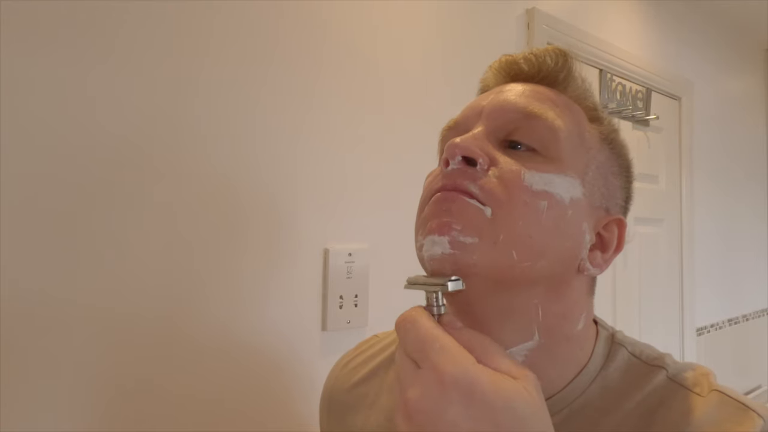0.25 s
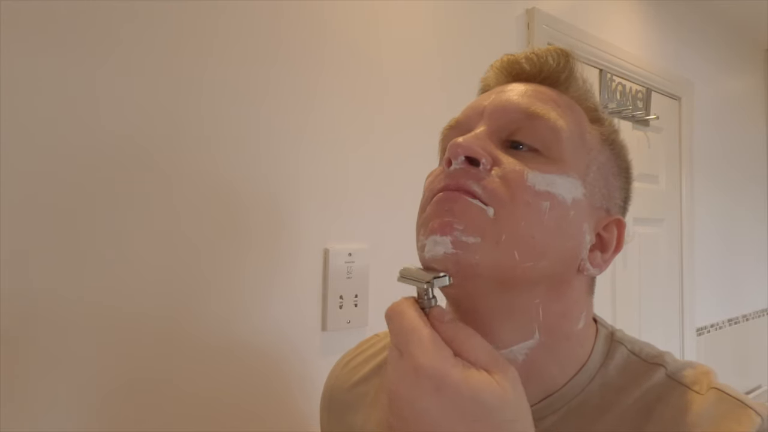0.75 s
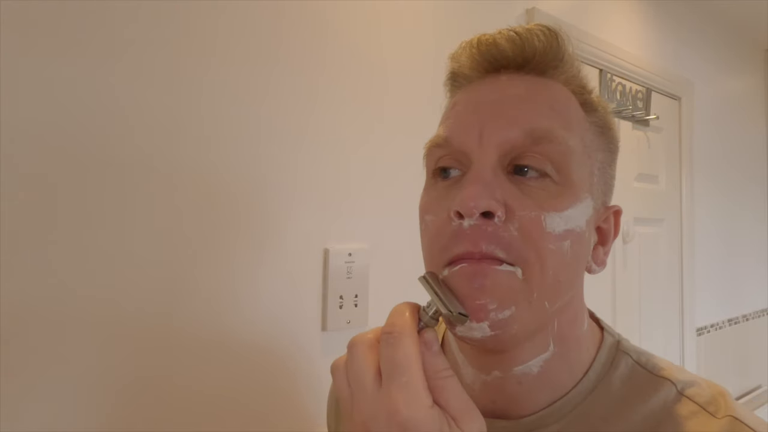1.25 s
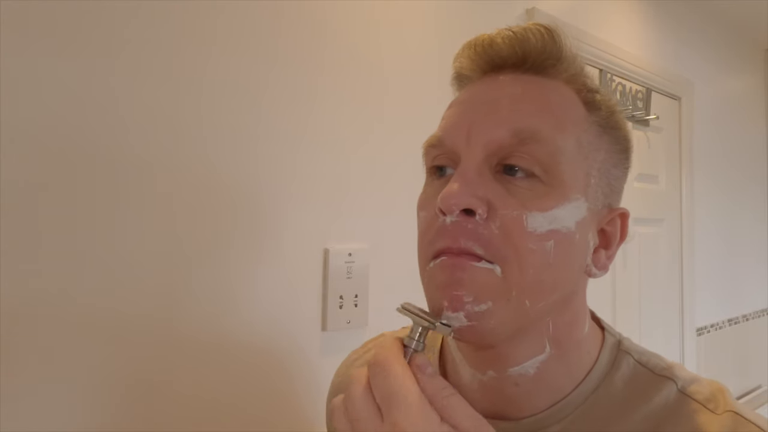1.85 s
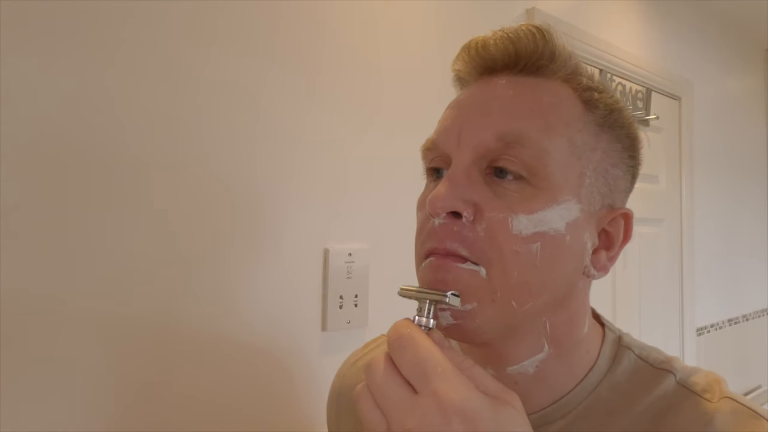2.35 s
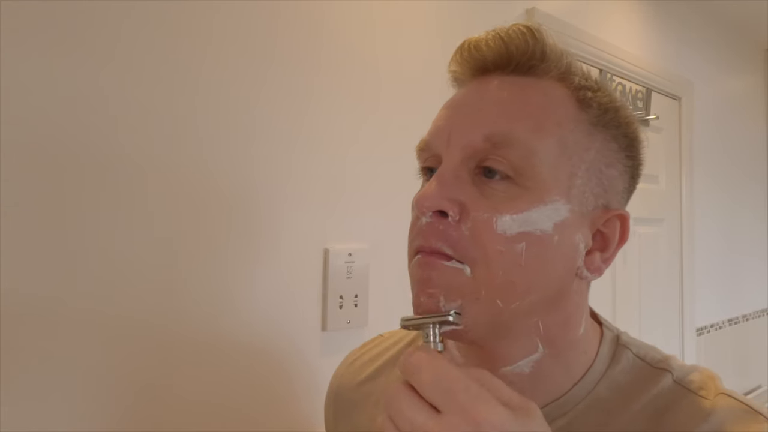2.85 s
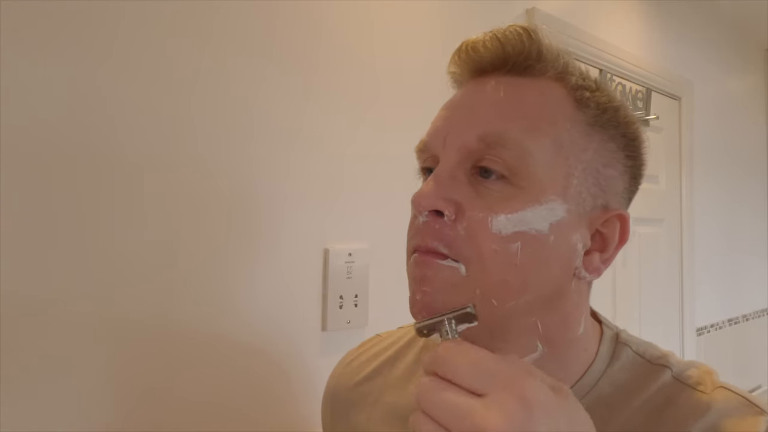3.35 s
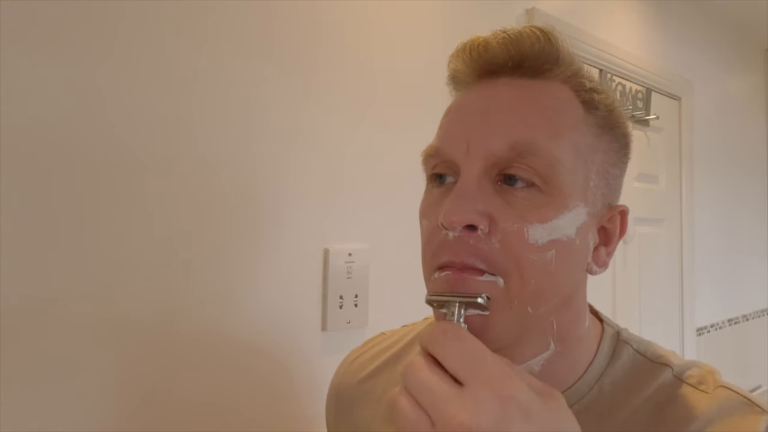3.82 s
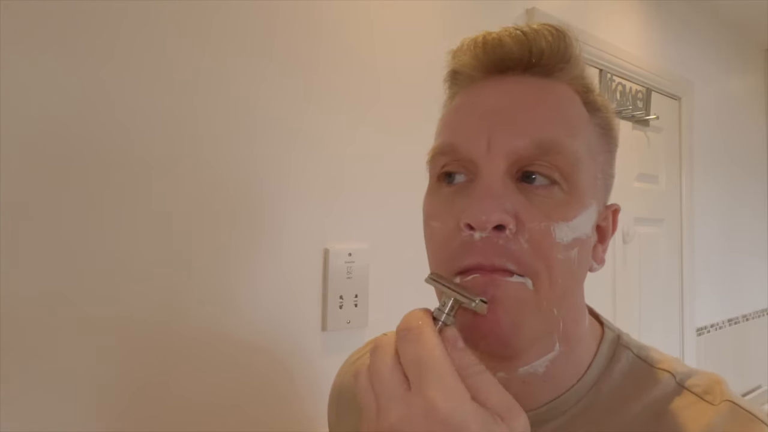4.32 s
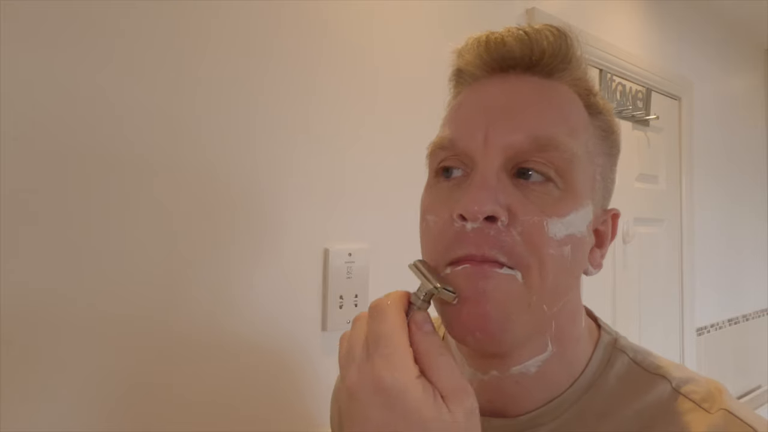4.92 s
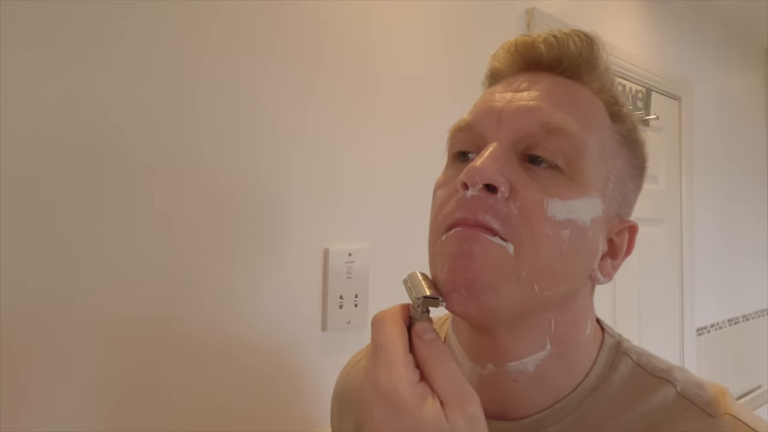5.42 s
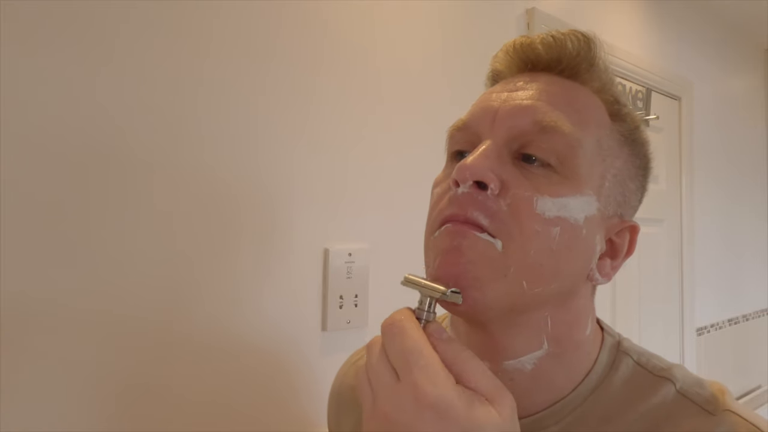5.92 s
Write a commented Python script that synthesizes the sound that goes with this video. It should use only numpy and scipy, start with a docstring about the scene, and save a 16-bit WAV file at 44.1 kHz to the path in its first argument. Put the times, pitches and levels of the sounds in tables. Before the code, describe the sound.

Short, raspy razor strokes on stubble, with a sink drain gulping and bubbling through the first half, in a small echoing bathroom.

```python
"""A drain glugs, ever more slowly, for the first few seconds in a small bathroom with a faint hum.
Each gulp of air thumps the waste pipe, and small bubbles fizz, gurgle and pop in between.
Almost at once a safety razor joins in, scraping lathered stubble in short strokes: every cut hair
is a tiny click, and thousands of them blur into a rasp. The shaving goes on after the drain stops.
The walls echo both the drain and the razor."""
import sys
import numpy as np
from scipy import signal
from scipy.fft import rfft, irfft, next_fast_len
from scipy.io import wavfile
from scipy.ndimage import uniform_filter1d

SR = 44100
rng = np.random.default_rng(int(sys.argv[2]) if len(sys.argv) > 2 else 0)


def put_to_file(sound):
    """Save the sound as 16-bit audio at rate SR, in the file named by the first command-line argument."""
    columns = np.atleast_2d(sound).T  # one column per channel
    safe = np.clip(columns, -1, 1)
    whole_steps = np.round(safe * 32767)
    wavfile.write(sys.argv[1], SR, whole_steps.astype(np.int16))


N = 272097
T = np.arange(N) / SR

# Levels are relative. A fade_s or t60 is the time a sound takes to die away by 60 dB.
# tone colour of the room's soft noise: pitch_hz, level_db
AIR_COLOUR = [(29, -35), (50, -12), (104, -10), (170, -5), (260, -2), (350, -0.5), (460, -11), (803, -10),
              (925, -16.5), (1290, -17.5), (1790, -22), (2730, -25), (7000, -40.5), (9070, -57.5),
              (11700, -47), (13800, -59.5)]
# how loud that noise is over time: time_s, level_db
AIR_LEVEL = [(0, -29), (1.5, -35), (3.0, -32.5), (3.75, -36.5), (4.2, -32.5), (5.0, -32.5), (5.6, -32),
             (6.17, -32.5)]
# tones of the low hum: pitch_hz, level_db
HUM_TONES = [(69, -45), (158, -43.5), (247.6, -40)]
# how loud the tiny bubbles fizz over time: time_s, level_db
FIZZ_LEVEL = [(0, -35), (.3, -48), (.6, -52.5), (.95, -49), (1.2, -50.5), (1.55, -61.5), (1.95, -45),
              (2.3, -63)]
# flurries of larger bubbles in the pipe: start_s, length_s, pitch_hz, level_db
GURGLES = [(0.006, .016, 925, -15.5), (0.456, 0.005, 1075, -29), (0.943, 0.0089, 684, -20.5),
           (1.115, .03, 792, -18), (1.282, .005, 890, -28.5)]
# gulps of air (snap and splash are added to the level): start_s, level_db, snap_db, splash_db
GULPS = [(0.042, 1.5, -27.5, -24.5), (0.2, 2.5, -25, -32), (0.375, 0.5, -37, -36), (0.529, 2, -27, -26),
         (0.704, 1.5, -34.5, -23), (0.838, 3.5, -21.5, -26.5), (1.03, -1, -23, -34), (1.179, 0.5, -37, -45),
         (1.382, 2, -27.5, -28), (1.507, 3.5, -29.5, -22.5), (1.669, -1, -30, -29), (1.83, 0, -27.5, -38),
         (2.042, 1.5, -27.5, -36), (2.251, 0, -26.5, -26), (2.475, 0, -28, -29), (2.688, 0, -26.5, -40),
         (2.921, -1.5, -27.5, -30), (3.158, -2, -29.5, -40), (3.428, -3.5, -34.5, -36)]
# ringing tones of the trap (the bend under the basin), pipe and plughole: pitch_hz, level_db, fade_s
TRAP_TONES = [(376.1, 2.5, 0.046), (556.4, 13, 0.035)]
PIPE_TONES = [(743.8, -6.5, 0.22), (858.8, -1, 0.16), (918, -4.5, 0.059), (1072.3, -6.5, 0.14),
              (1132.5, 1, 0.066)]
PLUGHOLE_TONES = [(2012, 5.5, 0.042), (2192, -1, 0.021), (2380, -5.5, 0.035), (2826, -1.5, 0.04)]
# tone colour of a bursting bubble's spray: pitch_hz, level_db
SPRAY_COLOUR = [(600, 13), (1500, -2), (2900, 5), (3500, -2), (4000, -3.5), (4550, 0), (5200, -4.5),
                (6100, 0.5), (7500, -44), (13000, -31.5)]
# first echoes off basin, mirror and walls: delay_ms, gain
ECHOES = [(6.56, .33), (9.24, .5), (11.66, .56), (14.3, .56), (17.18, .32), (19.57, .36), (25.83, .24),
          (28.32, .19), (49.12, .16), (52.3, .2), (55.08, .31), (57.86, .14), (80.62, .16), (86.99, .12)]
# how long the room's echo lingers: pitch_hz, fade_s
ROOM_FADE = [(150, 0.95), (400, 0.98), (1000, 0.71), (3000, 0.53), (7000, 0.29), (12000, 0.23)]
# the room's own tones, set ringing by each thump: pitch_hz, level_db, fade_s
ROOM_TONES = [(250, -16, 0.19), (281.5, 18, 0.64), (462, -8, 0.51)]
# small bubbles bursting (splash is added to the level): start_s, level_db, pitch_hz, splash_db
POPS = [(0.109, -25, 1980, -15), (0.2386, -23, 2880, -8), (0.2768, -24, 2010, -19), (.3058, -28, 2180, -13),
        (.4138, -28, 2000, -19), (0.472, -31, 2600, -9), (0.7648, -20, 2100, 3), (0.774, -25.5, 3500, -1),
        (0.9236, -22.5, 2010, -11), (0.9442, -15, 1970, -14), (1.282, -21.5, 1990, -14),
        (1.489, -17.5, 2110, -11), (1.6048, -22.5, 2020, -13), (1.8974, -29, 5800, -30),
        (1.933, -27, 3580, 14)]
# razor strokes (rasp comes from the blade's angle): start_s, swell_s, pull_s, level_db, rasp_db
STROKES = [(0.125, 0.019, 0.04, -40.5, -10), (0.458, 0.0095, 0.057, -42.5, -10),
           (0.735, .012, .115, -46.5, -3.5), (1.29, 0.058, 0.059, -39.5, -2.5),
           (1.671, 0.023, .112, -42.5, -4.5), (2.039, 0.029, 0.086, -41.5, -3),
           (2.422, 0.017, 0.049, -36, -10), (2.785, 0.057, 0.087, -41, 0.5), (3.22, 0.051, 0.038, -39, -3),
           (3.548, 0.028, 0.022, -39.5, -9), (3.845, 0.032, .035, -50.5, 8), (4.1, 0.037, 0.017, -47, 10),
           (4.425, 0.086, 0.026, -39, -3), (4.75, 0.054, 0.033, -45.5, 5), (4.995, 0.046, 0.036, -44.5, 1),
           (5.33, 0.037, .12, -57, 7), (5.487, 0.011, 0.017, -36.5, -6), (5.57, .02, .045, -51.5, 2.5),
           (5.915, 0.056, 0.049, -35, -4.5)]
# tone colour of a cut hair, heard through the razor's blade and head: pitch_hz, level_db
BLADE_COLOUR = [(700, -7), (1500, -1), (2600, 4), (4500, 0.5), (6500, 0.5), (7800, -5), (8800, -12.5),
                (9100, -13.5), (9600, -9), (10500, -2.5), (11400, 4), (12500, -3), (13300, -16.5),
                (14200, -37)]
# the blade catching on tough hairs: start_s, level_db
SNAGS = [(0.4673, -39), (0.7452, -44), (1.3495, -39.5), (2.075, -45), (2.438, -37), (2.8046, -40),
         (3.5707, -44), (5.0769, -38.5), (5.5024, -47), (5.927, -34.5), (5.9694, -37)]

FIZZ_END_S, EMPTY_S = 2.5, 3.46  # the fizz stops, then the basin runs dry
# how the gulps change as the basin empties: value when full, value when empty, curve (higher is later)
UPPER_TONE_SHIFT_DB = (-8.5, -18, 3)
PIPE_RING_DB = (-16.5, -24.5, 3.5)
POCKET_DB = (-19.5, -43.5, 2.5)
TRAP_FADE_STRETCH = (1.01, 1.54, 9.7)


def undb(db):
    """Turn decibels into a number to multiply a sound by."""
    return 10 ** (np.asarray(db) / 20)


def unit(x):
    """Scale a sound so its average strength (rms) is 1."""
    return x / np.sqrt(np.mean(x ** 2))


def add(track, start_s, sound):
    """Mix a sound into a track at the given time."""
    i = max(int(start_s * SR), 0)
    track[i:i + len(sound)] += sound[:N - i]


def at_pitch(points, hz):
    """Read between the rows of a (pitch_hz, value) table, giving each octave equal room."""
    pitches, values = np.transpose(points)
    return np.interp(np.log(hz + 1), np.log(pitches), values)


def colour(x, points):
    """Make each pitch louder or softer, following a (pitch_hz, level_db) table."""
    n = next_fast_len(x.shape[-1] + 1024)
    gain = undb(at_pitch(points, np.fft.rfftfreq(n, 1 / SR)))
    return irfft(rfft(x, n) * gain, n)[..., :x.shape[-1]]


def band(x, low_hz, high_hz):
    """Keep mainly the pitches between two limits."""
    return signal.sosfilt(signal.butter(2, [low_hz, high_hz], "band", fs=SR, output="sos"), x)


def fade(t60):
    """A level that dies away, a third of a second long."""
    return np.exp(-np.log(1000) * T[:SR // 3] / t60)


def wander(per_s):
    """A random curve that drifts up and down by about 1."""
    step = int(SR / per_s)
    stairs = np.repeat(rng.standard_normal(N)[:N // step + 1], step)
    return unit(uniform_filter1d(stairs, step)[:N])


def clicks(per_s, spread_db):
    """Random clicks of very uneven size."""
    spikes = (rng.random(N) < per_s / SR) * rng.choice([-1, 1], N)
    return unit(spikes * undb(spread_db * np.minimum(rng.exponential(size=N), 4)))


def ring(tones, scatter, contact_s, stretch=1):
    """A knocked object rings with its own tones, a little out of tune at each knock."""
    t = T[:SR // 3]
    detune = 1 + scatter * rng.standard_normal(len(tones))
    y = sum((-1) ** k * undb(db) * fade(t60 * stretch) * np.sin(2 * np.pi * hz * detune[k] * t)
            for k, (hz, db, t60) in enumerate(tones))
    y *= 1 - np.exp(-(t / contact_s) ** 2)  # a longer push gives a softer start
    return y / np.abs(y).max()


def room_tone():
    """Soft air noise and a low hum that wavers."""
    air = unit(colour(rng.standard_normal(N), AIR_COLOUR))
    air *= undb(np.interp(T, *np.transpose(AIR_LEVEL)) + 0.55 * wander(7.4))
    hum = np.zeros(N)
    for hz, db in HUM_TONES:
        phase = 2 * np.pi * hz * T
        tone = (0.62 + 0.78 * wander(12)) * np.sin(phase) + 0.76 * wander(12) * np.cos(phase)
        hum += undb(db - 2) * tone
    return air + hum


def fizz():
    """Tiny bubbles keep bursting in the plughole until the water runs low."""
    tick = undb(-12) * ring(PLUGHOLE_TONES, scatter=0.01, contact_s=0.00023) + spray(t60=0.019)
    crackle = unit(signal.fftconvolve(clicks(per_s=130, spread_db=9), tick)[:N])
    level = undb(np.interp(T, *np.transpose(FIZZ_LEVEL)))
    return crackle * level * np.clip((FIZZ_END_S - T) / 0.2, 0, 1)


def spray(t60):
    """A bursting bubble throws droplets in a sudden, short hiss."""
    decay = fade(t60)
    swell = 1 - np.exp(-(T[:len(decay)] / 0.0004) ** 2)
    y = colour(rng.standard_normal(len(decay)), SPRAY_COLOUR) * swell * decay
    return y / np.abs(y).max()


def gurgles():
    """Larger bubbles ring in the pipe in quick flurries of seven."""
    track = np.zeros(N)
    for start, length, hz, db in GURGLES:
        for when in np.linspace(start, start + length, num=7):
            pitch_hz = hz * (1 + 0.18 * rng.uniform(-1, 1))
            add(track, when, undb(db - 1) * bubble(pitch_hz, t60=0.037, swell_s=0.00078, glide=0.13))
    return track


def bubble(hz, t60, swell_s, glide):
    """Trapped air swells into a tone whose pitch slides as it fades (upward if glide is positive)."""
    decay = fade(t60)
    swell = (1 - np.exp(-T[:len(decay)] / swell_s)) ** 2
    pitch_hz = hz * (1 + glide * (0.5 - decay))
    y = swell * decay * np.sin(2 * np.pi * np.cumsum(pitch_hz) / SR)
    return y / np.abs(y).max()


def splatter(per_s=28, end_s=1.1, low_hz=2400, high_hz=4800):
    """Droplets, flung up while the basin is still full, tick at random moments and pitches."""
    track = np.zeros(N)
    for when, height, softness in rng.random((int(per_s * end_s), 3)):
        hz = low_hz * (high_hz / low_hz) ** height
        add(track, when * end_s, undb(-29.5 - 10 * softness) * pop(hz, t60=0.032, width=0.11))
    return track


def pop(hz, t60, width):
    """The rough, short ring of a bursting bubble: fading noise around one pitch."""
    decay = fade(t60)
    y = band(rng.standard_normal(len(decay)) * decay, hz * (1 - width), hz * (1 + width))
    return y / np.abs(y).max()


def draining(change, time_s):
    """A setting's value on its way from a full basin to an empty one."""
    full, empty, curve = change
    return full + (empty - full) * (time_s / EMPTY_S) ** curve


def gulps():
    """Each gulp thumps the trap, rings the pipe and plughole, and leaves a pocket of air."""
    thump, pipe, plughole, pocket = np.zeros((4, N))
    low_tone, (upper_hz, upper_db, upper_t60) = TRAP_TONES
    for start, db, snap_db, splash_db in GULPS:
        trap = [low_tone, (upper_hz, upper_db + draining(UPPER_TONE_SHIFT_DB, start), upper_t60)]
        stretch = draining(TRAP_FADE_STRETCH, start)
        pipe_db = db + draining(PIPE_RING_DB, start)
        hit = start + 0.001  # the water closes just after the air has passed
        add(thump, hit, undb(db - 0.14) * ring(trap, scatter=0.004, contact_s=0.00086, stretch=stretch))
        add(pipe, hit, undb(pipe_db) * ring(PIPE_TONES, scatter=0.018, contact_s=0.0009))
        add(pipe, hit, undb(pipe_db - 3.5) * pop(787, t60=0.063, width=0.27))  # water slaps back
        snap = ring(PLUGHOLE_TONES, scatter=0.012, contact_s=0.0003)
        add(plughole, hit, undb(db + snap_db + 7) * snap)
        add(plughole, hit, undb(db + splash_db + 10.5) * spray(t60=0.043))
        pocket_hz = 171.4 * (1 + 0.067 * rng.standard_normal())
        pocket_tone = bubble(pocket_hz, t60=0.074, swell_s=0.025, glide=-0.11)
        add(pocket, start, undb(draining(POCKET_DB, start)) * pocket_tone)
    return thump, pipe, plughole, pocket


def echoes(x, share):
    """A sound followed by its first bounces off basin, mirror and walls."""
    y = x.copy()
    for delay_ms, gain in ECHOES:
        add(y, delay_ms / 1000, share * gain * x)
    return y


def reverb(x, build_s):
    """Countless later echoes blur into a tail whose high pitches die first."""
    hz, t, noise = signal.stft(rng.standard_normal(SR), SR, nperseg=256)
    decay = np.exp(-np.log(1000) * t / at_pitch(ROOM_FADE, hz)[:, None]) * (1 - np.exp(-t / build_s))
    decay /= np.sqrt(np.mean(decay ** 2, axis=1))[:, None]  # same energy at every pitch
    tail = signal.istft(noise * decay, SR)[1]
    return signal.fftconvolve(x, tail / np.linalg.norm(tail))[:N]


def bubble_pops():
    """Small bubbles burst in the plughole, each with a little spray."""
    track = np.zeros(N)
    for start, db, hz, splash_db in POPS:
        add(track, start, undb(db) * pop(hz, t60=0.029, width=0.051))
        add(track, start, undb(db + splash_db - 5.5) * spray(t60=0.063))
    return track


def drain():
    """All the water sounds, echoing around the bathroom."""
    thump, pipe, plughole, pocket = gulps()
    plughole += bubble_pops()
    pipe += gurgles()
    plughole += fizz() + splatter()
    low = echoes(thump, share=1)
    add(low, 0.024, undb(-7.5) * reverb(thump, build_s=0.0055))  # the tail follows the first echoes
    room_ring = ring(ROOM_TONES, scatter=0.0018, contact_s=0.0037)
    low += undb(-61) * signal.fftconvolve(thump, room_ring)[:N]
    middle = echoes(pipe, share=0.41) + undb(-1.5) * reverb(pipe, build_s=0.0017)
    high = echoes(plughole, share=0.15) + undb(-4.5) * reverb(plughole, build_s=0.0039)
    return low + middle + high + pocket + undb(-7.5) * reverb(pocket, build_s=0.022)


def stroke(start_s, swell_s, pull_s, swell_db=20, ease_db_per_s=31, lift_db_per_s=694.5):
    """Pressure of one stroke: the blade bites, eases along the pull and lifts off."""
    t = T - start_s
    bite = swell_db * np.clip(1 - t / swell_s, 0, 1)
    ease = ease_db_per_s * np.maximum(t - swell_s, 0)
    lift = lift_db_per_s * np.clip(t - swell_s - pull_s, 0, 1)
    return undb(-bite - ease - lift) * (t > 0)


def razor():
    """The blade cuts thousands of hairs a second, each a click, through hissing lather."""
    pressure, rasp = np.zeros(N), np.ones(N)
    for start, swell_s, pull_s, db, rasp_db in STROKES:
        pressure += undb(db) * stroke(start, swell_s, pull_s)
        rasp[int(start * SR):] = undb(rasp_db)
    pressure *= undb(2 * wander(130))  # dragging on skin makes the stroke judder
    for start, db in SNAGS:
        add(pressure, start, undb(db) * fade(t60=0.035))
    cuts = np.array([clicks(per_s=2800, spread_db=5) for _ in range(2)])
    lather = undb(-0.5) * rng.standard_normal((2, N))
    scrape = colour(cuts + lather, BLADE_COLOUR)
    scrape = pressure * scrape / np.std(band(scrape[0], 7500, 14000))
    # a steeper blade brings out the lower part of the scrape
    body = colour(scrape, [(2500, 0), (4500, -3), (7000, -9), (10000, -31)])
    scrape += (rasp - 1) * body
    centre, side = (undb(-1) * x + undb(-3) * reverb(x, build_s=0.0035) for x in scrape)
    # only the highest sizzle differs from left to right, and it leans to the right
    sizzle = colour(undb(-4.5) * side - 0.22 * centre, [(10700, -60), (11600, 0), (13500, 0),
                                                        (15000, -20)])
    return np.array([centre + sizzle, centre - sizzle])


def scene():
    """The razor in stereo, with the drain and room noise in the centre."""
    return razor() + drain() + room_tone()


def record(dry):
    """The microphone drops the deepest bass, clips any peak that is too loud and cuts the very top."""
    lean = signal.sosfilt(signal.butter(2, 35, "high", fs=SR, output="sos"), dry)
    top_cut = signal.ellip(8, 0.2, 70, 14200, fs=SR, output="sos")
    return signal.sosfilt(top_cut, np.clip(lean, -1, 1))


dry = scene()
out = record(dry)
put_to_file(out)
```